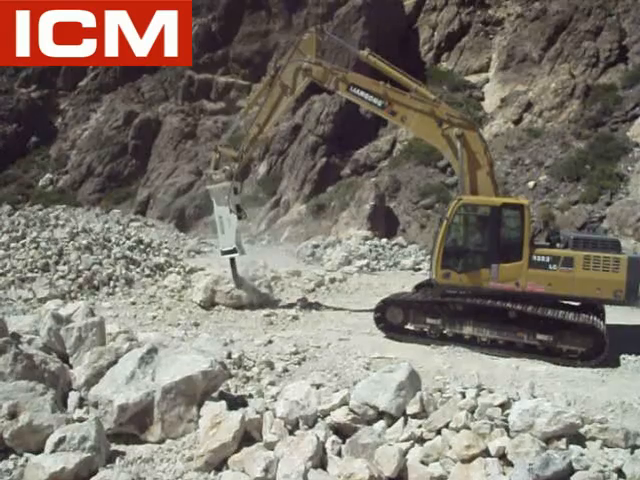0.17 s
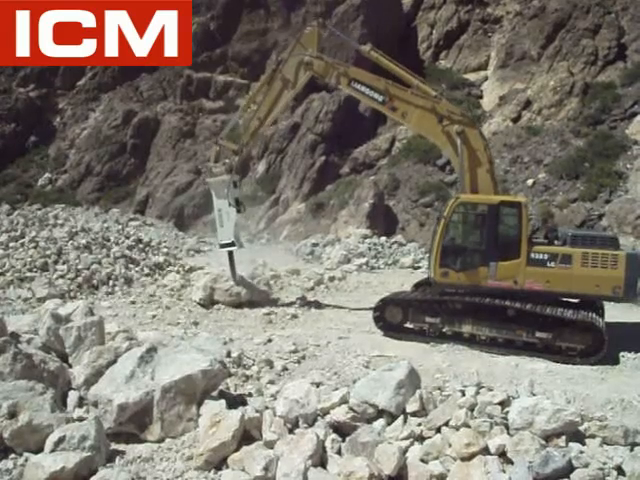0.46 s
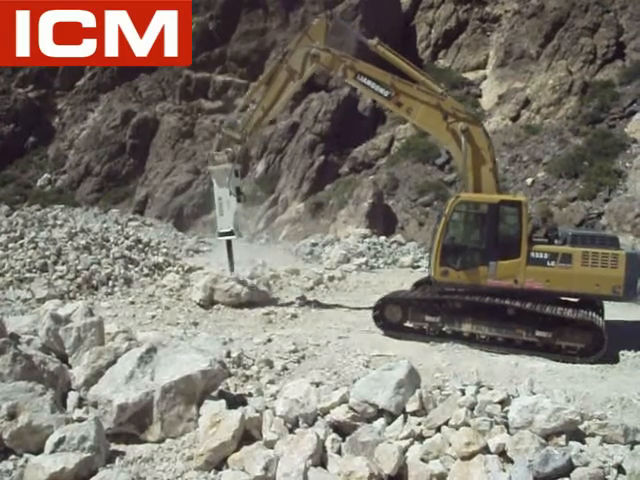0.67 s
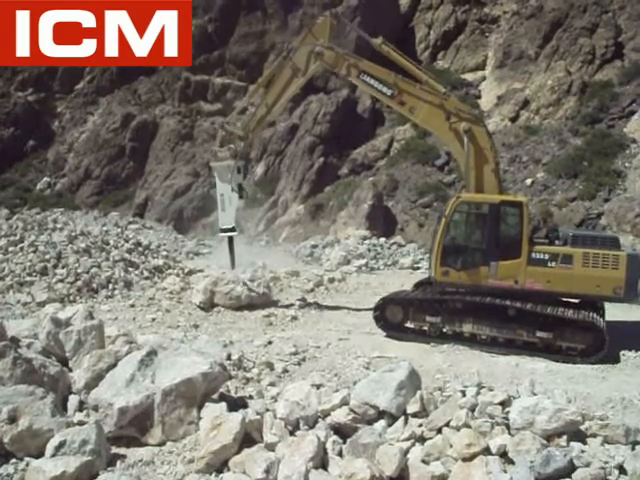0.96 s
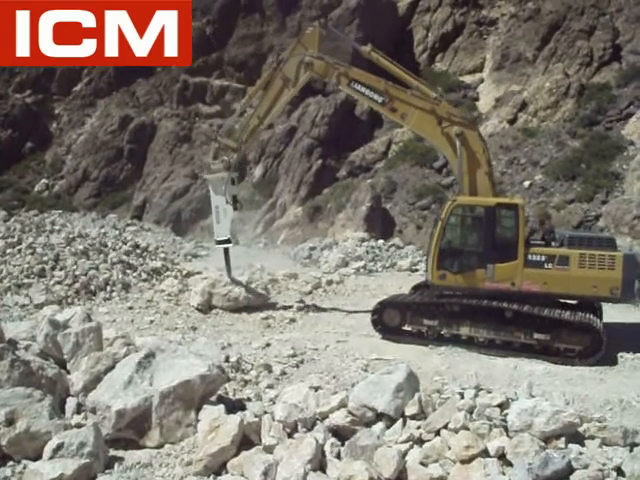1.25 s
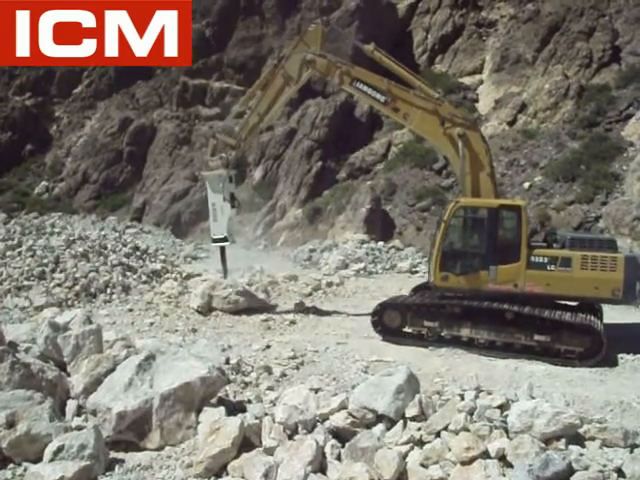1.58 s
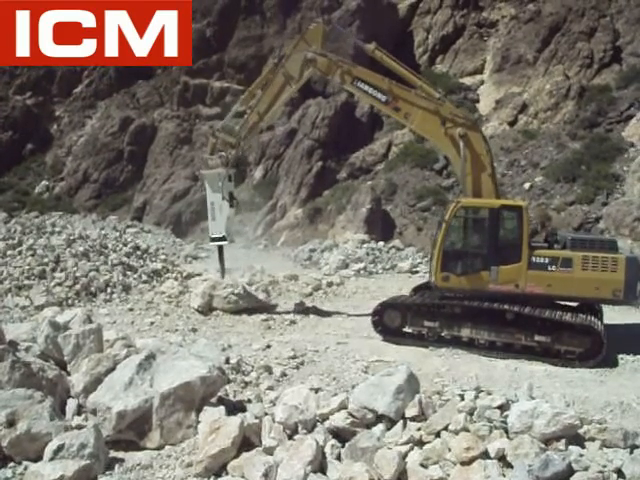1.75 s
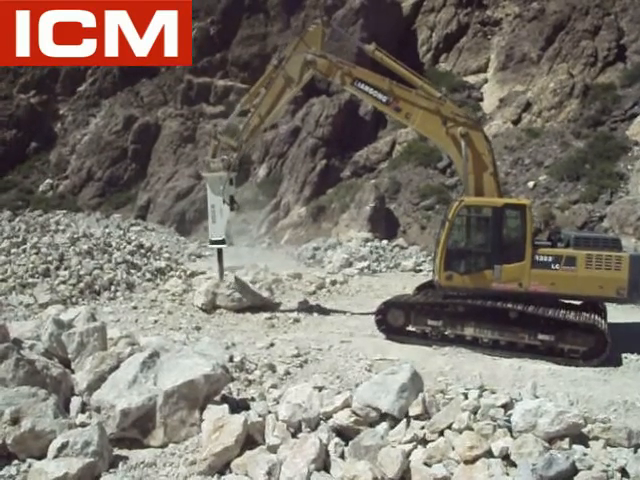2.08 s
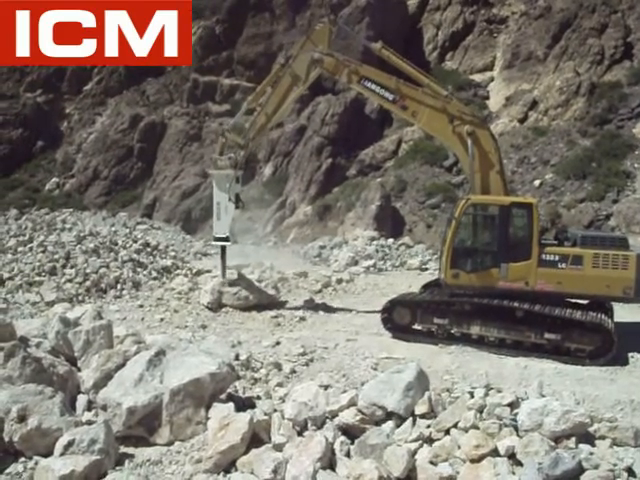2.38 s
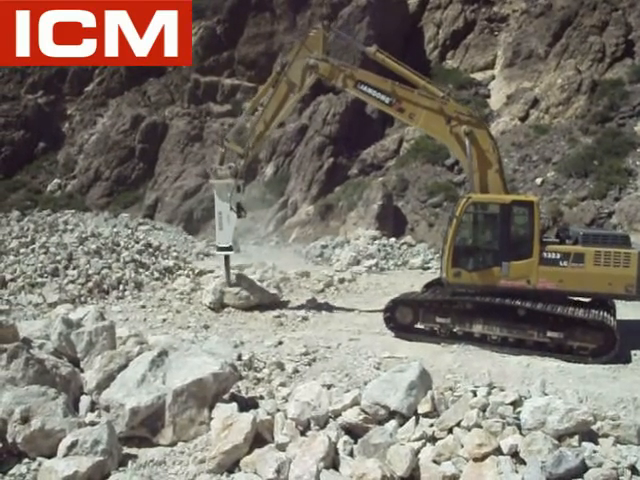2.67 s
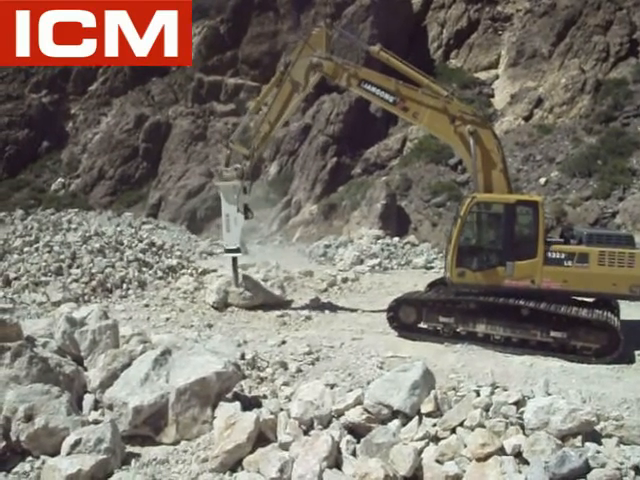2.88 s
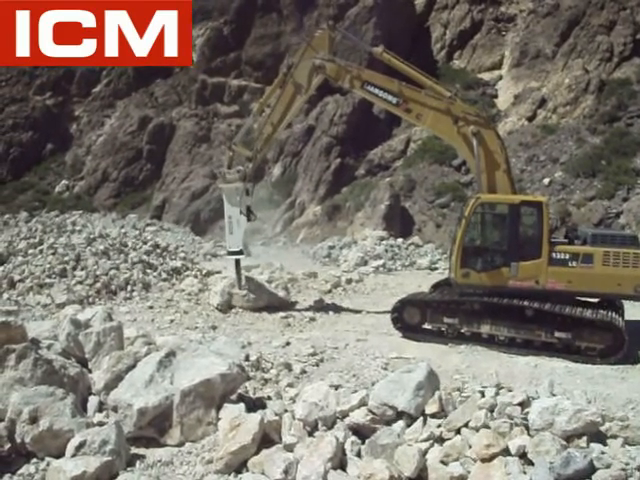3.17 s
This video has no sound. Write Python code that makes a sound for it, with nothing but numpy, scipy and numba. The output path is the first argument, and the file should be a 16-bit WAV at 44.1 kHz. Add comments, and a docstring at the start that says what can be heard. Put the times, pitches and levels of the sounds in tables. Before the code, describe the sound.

An excavator's steel breaker chisel strikes rock once and rings, then scrapes and knocks on the stone in two clusters as chips snap off. A diesel engine drones beneath, quarry walls echo, and wind buffets the microphone.

```python
"""An excavator's hydraulic breaker is lifted off a quarry boulder and set down again.
A last blow excites the chisel's normal modes; the steel then scrapes and knocks on rock, chips snap
off, and the walls reverberate. Periodic firing of the diesel engine drives the drone beneath.
Wind buffets the microphone, and a fast limiter ducks everything under each strong buffet."""
import sys
import numpy as np
from scipy import signal
from scipy.fft import rfft, irfft, next_fast_len
from scipy.io import wavfile
from numba import njit

SR = 44100
rng = np.random.default_rng(int(sys.argv[2]) if len(sys.argv) > 2 else 0)


def store_wav(level_fs):
    """Save 16-bit WAV to argv[1]."""
    pcm = np.round(np.clip(np.atleast_2d(level_fs), -1, 1) * 32767)
    wavfile.write(sys.argv[1], SR, pcm.T.astype(np.int16))


N = 146853


def undb(db):
    """Amplitude ratio of a level in decibels."""
    return 10 ** (np.asarray(db) / 20)


def unit(x):
    """Normalisation to rms 1."""
    return x / np.sqrt(np.mean(x ** 2))


def clock():
    """Uniform sampling: t/s of each sample."""
    return np.arange(N) / SR


def curve(table, column=1):
    """Linear interpolation of one column in time."""
    rows = np.array(table)
    return np.interp(clock(), rows[:, 0], rows[:, column])


def colour(x, spectrum):
    """Minimum-phase filter of unit power gain: only the relative levels of the spectrum count."""
    size = next_fast_len(2 * N)
    size += size % 2
    hz, db = np.array(spectrum).T
    log_hz = np.log(np.maximum(np.fft.rfftfreq(size, 1 / SR), 1))
    gain = unit(undb(np.interp(log_hz, np.log(hz), db, right=db[-1] - 20.5)))
    cepstrum = irfft(np.log(gain))
    cepstrum[1:size // 2] *= 2  # folding the cepstrum makes the filter causal
    cepstrum[size // 2 + 1:] = 0
    return irfft(rfft(x, size) * np.exp(rfft(cepstrum)))[:N]


def noise(spectrum):
    """Filtered Gaussian noise of rms 1."""
    return unit(colour(rng.standard_normal(N), spectrum))


def burst(envelope, spectrum):
    """Amplitude-modulated noise, then filtered."""
    return colour(envelope * rng.standard_normal(N), spectrum)


def impulses(per_s):
    """Poisson process of impulses with random strengths."""
    return (rng.random(N) < per_s / SR) * rng.standard_normal(N)


def drift(per_s):
    """Interpolated random fluctuation with a spread near 1."""
    knots = rng.standard_normal(512)
    return np.interp(clock() * per_s, np.arange(len(knots)), knots)


def decay(start, t60):
    """Exponential decay from a sudden onset, 60 dB in t60 seconds."""
    age = clock() - start
    return (age >= 0) * np.exp(-np.log(1000) * np.maximum(age, 0) / t60)


def ring(hits, modes):
    """Modal superposition: each hit (t/s, level/dB) excites damped sinusoids."""
    force = np.zeros(N)
    for start, db in hits:
        force[int(start * SR)] += undb(db)
    response = sum(undb(db) * decay(0, t60) * np.sin(2 * np.pi * hz * clock()) for hz, db, t60 in modes)
    return signal.fftconvolve(force, response)[:N]


# Chisel modes, heavily and lightly damped: f/Hz, level/dB, T60/s
CHISEL_SHORT_MODES = [(1873, -14, .03), (2160, 0, .06), (2330, -8, .04), (2610, -9, .03), (2929, -9, .03),
                      (3400, -14, .03)]
CHISEL_LONG_MODES = [(2159, -30.5, 2.5), (2280, -31, 2), (2350, -25, 1.8), (2410, -29, 0.78),
                     (2620, -29.5, 2.2), (2627, -31, 1.6)]
# Spectra of steel cracking on rock and of the hammering's reverberation: f/Hz, level/dB
CRACK_SPECTRUM = [(150, -12), (500, 6.5), (1000, 4.5), (1500, 5), (2200, 7), (3000, 11), (3600, 2.5),
                  (4300, -10), (5500, -22), (6200, -36.5)]
REVERB_SPECTRUM = [(300, -19.5), (440, -5.5), (487, 6), (530, -5), (700, -12.5), (1100, -9), (1400, -13.5),
                   (1950, -6), (2060, -1), (2160, 5.5), (2280, 0.5), (2370, 1), (2460, -4), (2600, 0),
                   (2750, -3), (2950, -4), (3400, -14.5), (4200, -26.5), (6000, -57)]

def last_blow(start=.0085):
    """Impact excitation rings the chisel while the reverberation of earlier hammering dies away."""
    chisel = ring([(start, 3)], CHISEL_SHORT_MODES + CHISEL_LONG_MODES)
    crack = undb(-1) * burst(decay(start, t60=.05), CRACK_SPECTRUM)
    sag_db_per_s, hold_s, fade_60_db_s = 14, .35, .65
    fall_db = sag_db_per_s * clock() + 60 * np.maximum(clock() - hold_s, 0) / fade_60_db_s
    flicker_db = 1.8 * drift(per_s=90)
    reverberation = undb(-13) * burst(undb(flicker_db - fall_db), REVERB_SPECTRUM)
    return chisel + crack + reverberation


# Spectra of the exhaust, the fan and body roar, and the clatter: f/Hz, level/dB
EXHAUST_SPECTRUM = [(60, -15), (80, -1), (160, -3), (245, 5), (320, -1.5), (420, -17), (600, -13.5),
                    (900, -29.5), (2000, -58.5)]
ROAR_SPECTRUM = [(70, -16.5), (130, -7.5), (170, -1), (250, 0.5), (330, -1.5), (420, -9), (520, -11),
                 (600, -5), (730, -8.5), (880, -20.5), (1100, -14), (1500, -25.5), (3000, -52.5)]
CLATTER_SPECTRUM = [(400, -19), (900, -3.5), (1400, -2.5), (2000, -1.5), (2550, 2), (2950, 1.5),
                    (3300, -9.5), (3800, -16), (4400, -23), (5300, -32), (6200, -55)]
# Engine swell: t/s, exhaust and roar level/dB, clatter level/dB
ENGINE_SWELL = [(0, -4.5, -2.5), (.4, -0.5, 1), (.8, -1, 3), (1.1, 2, 2.5), (1.5, -1.5, -4),
                (1.9, 2.5, 0.5), (2.3, 0, 1), (2.6, 1.5, -1), (3, -3, -2), (3.15, 2.5, 0.5), (3.33, 3, 2.5)]

def engine(firing_hz=80.82, jitter=.014, scatter_db=4, clatter_decay_cycles=4.2):
    """Source and filter: uneven firings drive the exhaust and modulate the clatter over a broad roar."""
    cycles = np.cumsum(firing_hz * (1 + jitter * drift(per_s=60) + .004 * drift(per_s=2))) / SR
    firings = np.diff(np.floor(cycles), prepend=0) * undb(scatter_db * rng.standard_normal(N))
    exhaust = undb(-25.5) * unit(colour(firings, EXHAUST_SPECTRUM))
    throb = unit(np.exp(-(cycles % 1) / clatter_decay_cycles) * undb(2.8 * drift(per_s=80)))
    roar = noise(ROAR_SPECTRUM) * undb(-17.5 + 2.15 * drift(per_s=15))
    clatter = undb(-22.5) * burst(throb, CLATTER_SPECTRUM)
    return undb(curve(ENGINE_SWELL)) * (exhaust + roar) + undb(curve(ENGINE_SWELL, column=2)) * clatter


# Wind rumble spectrum: f/Hz, level/dB
WIND_SPECTRUM = [(5, -2.5), (14, 1), (45, 1.5), (62, -1.5), (85, -0.5), (120, -8.5), (200, -11.5),
                 (500, -41.5), (2000, -69)]
# Wind strength: t/s, level/dB
WIND_LEVEL = [(0, -23.5), (.2, -19), (.4, -16.5), (.75, -13), (1, -14), (1.25, -15), (1.35, -17.5),
              (1.5, -14.5), (1.75, -12), (2.05, -17.5), (2.35, -11.5), (2.55, -11.5), (2.7, -19.5),
              (2.83, -7.5), (2.93, -15), (3.05, -12.5), (3.33, -19.5)]
# Pressure pulses: t/s, peak level/dB, 1/e half-width/s
BUFFETS = [(0.414, 5.5, 0.0024), (0.437, 2.5, 0.0025), (1.185, 6.5, 0.0033), (1.663, 5.5, 0.0016),
           (2.001, 7.5, 0.0029), (2.084, 3.5, 0.0021), (2.234, 12.5, 0.002), (2.351, 2, 0.0034),
           (2.802, 10, 0.002), (3.177, 6.5, 0.0012)]

def wind():
    """Pressure fluctuations at the microphone: a rumble with single Gaussian dips, the buffets."""
    buffets = sum(undb(db) * np.exp(-((clock() - centre) / width) ** 2) for centre, db, width in BUFFETS)
    return noise(WIND_SPECTRUM) * undb(curve(WIND_LEVEL)) - buffets


# Chips snapping off: t/s, level/dB
CHIPS = [(0.113, -14), (0.221, -10.5), (0.851, -16.5), (1.2165, -7.5), (1.293, 5), (1.483, -12.5),
         (1.522, -10), (1.553, -11.5), (2.77, -17), (2.914, -7)]
# Spectra of the snaps and the fine grit: f/Hz, level/dB
CHIP_SPECTRUM = [(1000, -18), (2800, 2.5), (4200, -11), (5400, -18), (6200, -24.5)]
GRIT_SPECTRUM = [(1000, -20), (2800, 5), (4200, -5), (5200, -10.5), (5800, -30)]

def chips():
    """Brittle fracture: stone splits in short bright snaps over sparse fine grit."""
    snaps = burst(sum(undb(db) * decay(start, t60=.0093) for start, db in CHIPS), CHIP_SPECTRUM)
    grit = unit(colour(impulses(per_s=160), GRIT_SPECTRUM))
    return snaps + undb(-54) * grit


# Hum of the lift: t/s, f/Hz, level/dB
LIFT_HUM = [(.22, 79.35, -23), (.36, 78.2, -23.5), (.44, 73.2, -14.5), (.6, 73.6, -16), (.78, 75.7, -20),
            (.87, 79.7, -15.5), (1, 76.6, -50)]

def lift():
    """Forced vibration: the machine hums under load as the arm rises."""
    tone = np.sin(2 * np.pi * np.cumsum(curve(LIFT_HUM)) / SR)
    return unit(tone) * undb(curve(LIFT_HUM, column=2) + drift(per_s=13))


# Drags over the boulder: t/s, duration/s, grinding level/dB, groan level/dB
SCRAPES = [(1.092, 0.034, -21, -27.5), (1.231, .075, -44, -17.5), (1.361, 0.17, -32, -35),
           (1.486, .17, -23, -24), (2.627, 0.11, -19, -18), (3.103, 0.078, -27.5, -26)]
# Grinding spectrum: f/Hz, level/dB
GRINDING_SPECTRUM = [(150, -14), (330, 4), (490, 1), (700, -2), (1100, -1), (1500, -3.5), (2800, 3),
                     (3600, -10), (4500, -24), (6400, -44.5)]
# Modes of the breaker's housing: f/Hz, level/dB, T60/s
HOUSING_MODES = [(453, -4.5, .059), (488, -1.5, 0.37), (579.4, 3.5, .11), (608, 0, 0.08), (679, 2, 0.051)]

def scrapes():
    """Sliding friction: the chisel crushes grains of stone, whose impulses make the housing groan."""
    grains = impulses(per_s=700)
    grinding = unit(colour(grains, GRINDING_SPECTRUM))
    housing = ring([(.00064, 0)], HOUSING_MODES)
    groan = unit(signal.fftconvolve(grains, housing)[:N])
    direct = np.zeros(N)
    for start, duration, grinding_db, groan_db in SCRAPES:
        progress = np.clip((clock() - start) / duration, 0, 1)
        force = np.sqrt(np.abs(np.sin(np.pi * progress)))
        direct += force * (undb(grinding_db) * grinding + undb(groan_db) * groan)
    return direct + undb(.5) * wall_echo(direct)


# Spectrum returned by the rock walls: f/Hz, level/dB
WALL_SPECTRUM = [(100, 10), (3000, -2.5), (4200, -7), (5200, -1.5), (6500, -22)]

def wall_echo(x, t60=1.47, build_s=.0027):
    """Diffuse reflection: the quarry walls return a slightly dull, exponentially decaying tail."""
    envelope = decay(0, t60) * (1 - np.exp(-clock() / build_s))
    response = unit(burst(envelope, WALL_SPECTRUM)) / np.sqrt(N)
    return undb(-8) * signal.fftconvolve(x, response)[:N]


# Knocks on rock: t/s, crack level/dB, crack T60/s, then level/dB of boom, clank, ring, zing, ping
KNOCKS = [(1.2163, -11.5, 0.049, -16, -44, -21, -48, -43), (1.2947, -1, 0.076, -32, -21, -35, -41, -32),
          (1.427, -13.5, 0.035, -40, -41, -50, -45, -37),
          (1.485, -10, 0.055, -26.5, -36, -42, -19.5, -23.5),
          (1.522, -8, 0.018, -29, -34, -31, -19.5, -39.5), (1.553, -18, .032, -35.5, -46, -44.5, -31, -45),
          (2.641, -13.5, 0.06, -15, -36.5, -38, -46, -45), (2.6726, -13, .033, -32, -27.5, -43, -45, -49),
          (2.6941, -10, 0.042, -23.5, -23, -40, -31, -39), (2.736, -10.5, 0.046, -23, -23, -52, -51, -45.5),
          (2.822, -12.5, .03, -49, -47, -51, -50.5, -53), (2.9108, -3, 0.072, -27.5, -17, -46.5, -46, -20),
          (3.0353, -11, 0.029, -29, -21.5, -55, -44, -35)]
# Breaker modes in those five families: f/Hz, level/dB, T60/s
BREAKER_MODES = {"boom": [(488, 0, .42), (545, -7, .3)], "clank": [(995, -5, .7), (1030, -8, .5),
                 (1098, -7, .55), (1122, -9, .5), (1594, -6, .15)], "ring": [(2174, 0, .35),
                 (1890, -7, .15)], "zing": [(2562, 0, .38), (2590, -7, .3), (2930, -5, .5)],
                 "ping": [(2868, -1, .95), (2896, -4, .7), (2835, -8, .6), (2690, -6, .2),
                 (3560, -11, .12)]}

def knocks(waver_db=3.2):
    """Modal excitation depends on the contact point: each knock cracks and rings with its own mix."""
    crack = burst(sum(undb(db) * decay(start, t60) for start, db, t60, *_ in KNOCKS), CRACK_SPECTRUM)
    rows = np.array(KNOCKS)
    starts, family_levels = rows[:, 0], rows[:, 3:].T
    steel = np.zeros(N)
    for levels, modes in zip(family_levels, BREAKER_MODES.values()):
        steel += ring(zip(starts, levels), modes) * undb(2 + waver_db * drift(per_s=70))
    return crack + steel + wall_echo(undb(1.5) * crack + undb(-3) * steel)


def scene():
    """Superposition of machine, rock and wind at one microphone."""
    machine = engine() + lift()
    steel_on_rock = last_blow() + knocks() + chips() + scrapes()
    return (machine + steel_on_rock + wind())[None]


@njit
def limit(x, ceiling, attack_s, release_s):
    """Peak limiting: the gain falls while an envelope follower exceeds the ceiling."""
    attack = 1 - np.exp(-1 / (attack_s * SR))
    release = 1 - np.exp(-1 / (release_s * SR))
    out, peak = np.empty(len(x)), 0.
    for i in range(len(x)):
        size = abs(x[i])
        if size > peak:
            peak += (size - peak) * attack
        else:
            peak -= peak * release
        out[i] = x[i] * ceiling / max(peak, ceiling)
    return out


def record(dry, saturation=.88, cutoff_hz=6200):
    """Fast limiting ducks the peaks, soft saturation rounds them, and a low-pass narrows the band."""
    held = limit(dry[0], ceiling=.68, attack_s=.0003, release_s=.015)
    rounded = held / (1.25 + (held / saturation) ** 6) ** (1 / 6)
    lowpass = signal.butter(20, cutoff_hz, fs=SR, output="sos")
    return signal.sosfiltfilt(lowpass, rounded)[None]


dry = scene()
out = record(dry)
store_wav(out)
```